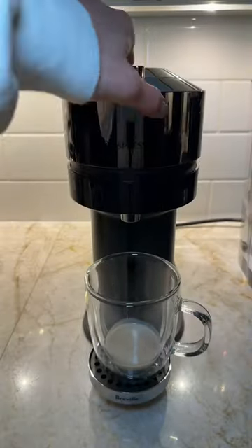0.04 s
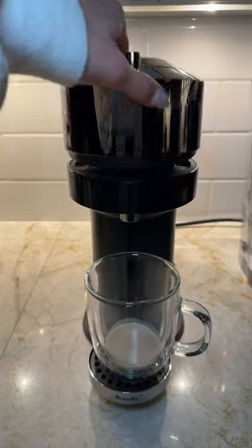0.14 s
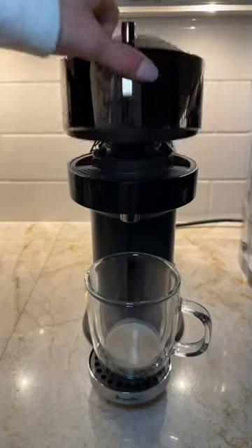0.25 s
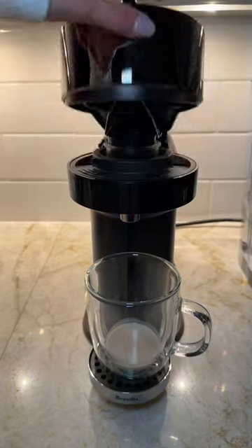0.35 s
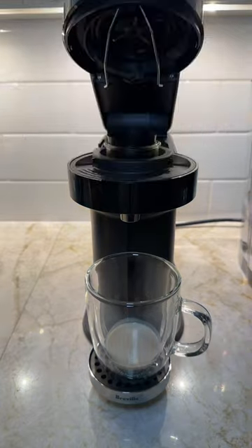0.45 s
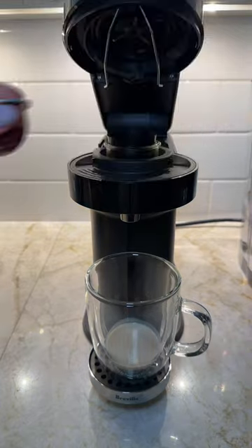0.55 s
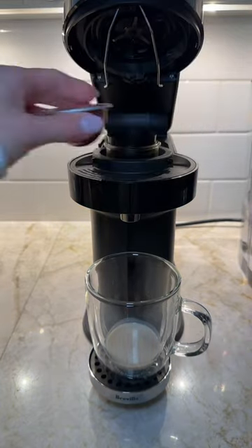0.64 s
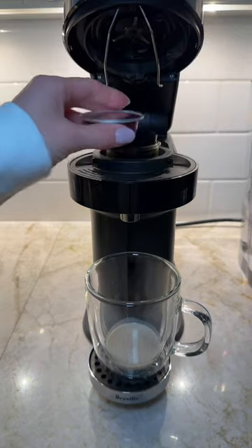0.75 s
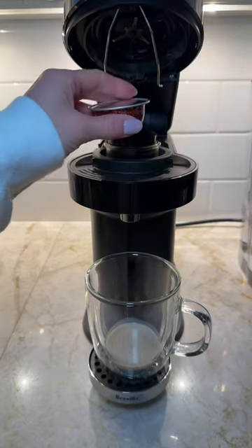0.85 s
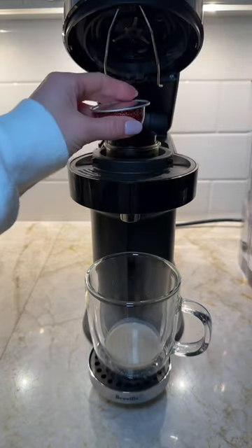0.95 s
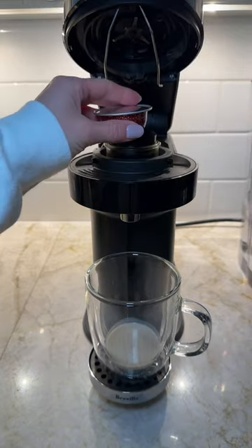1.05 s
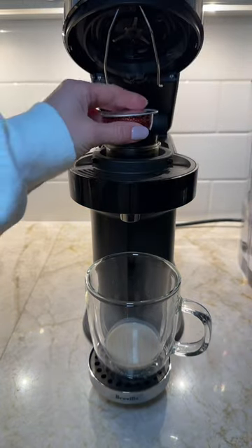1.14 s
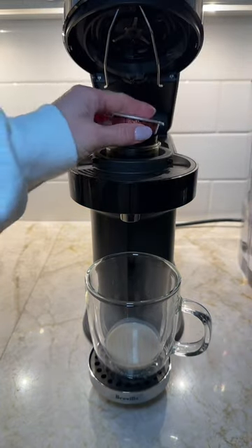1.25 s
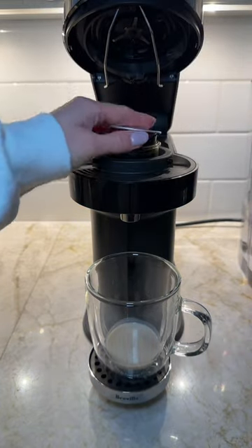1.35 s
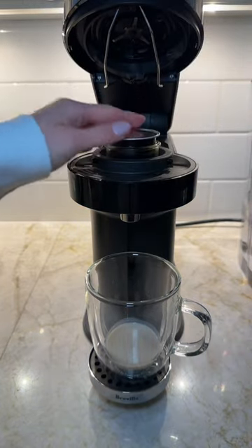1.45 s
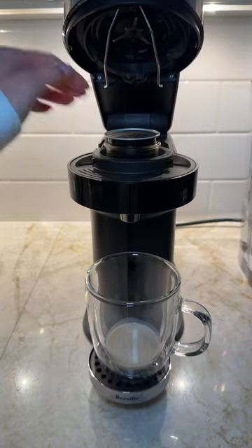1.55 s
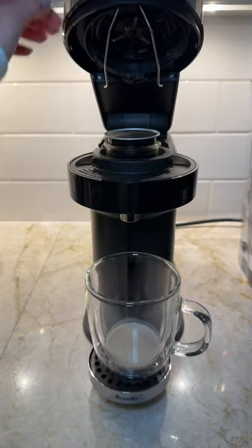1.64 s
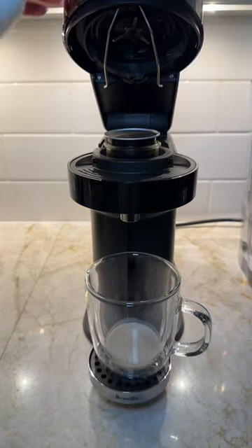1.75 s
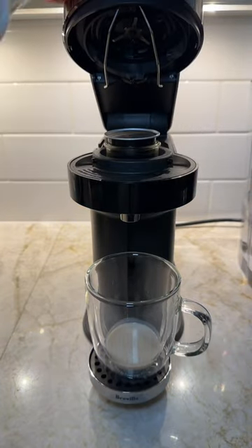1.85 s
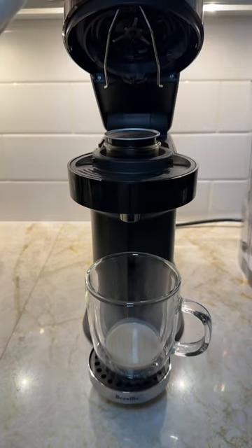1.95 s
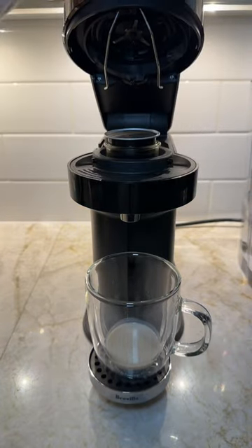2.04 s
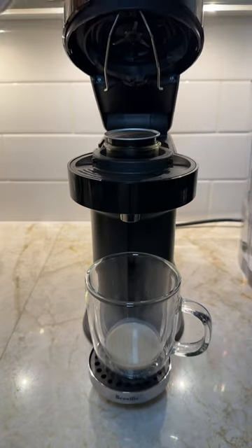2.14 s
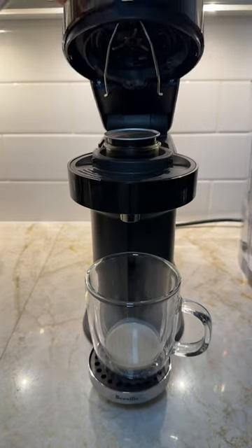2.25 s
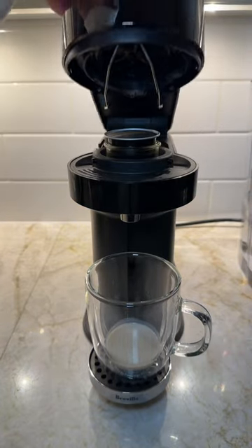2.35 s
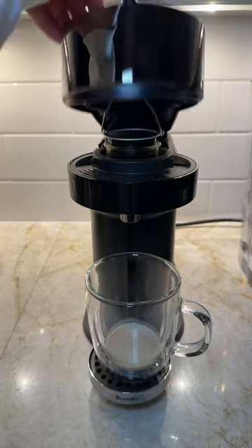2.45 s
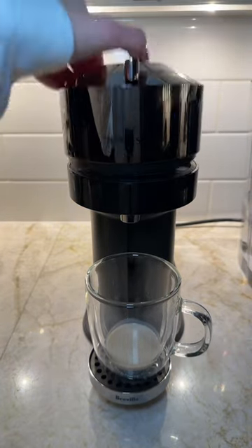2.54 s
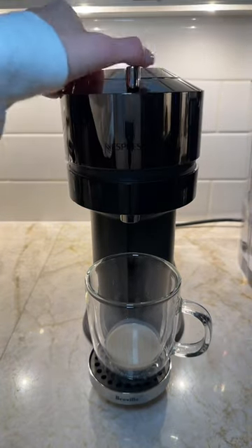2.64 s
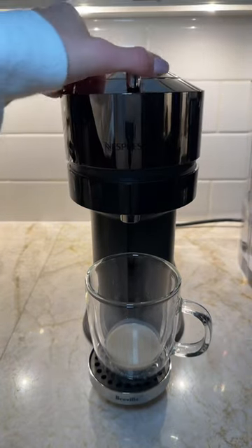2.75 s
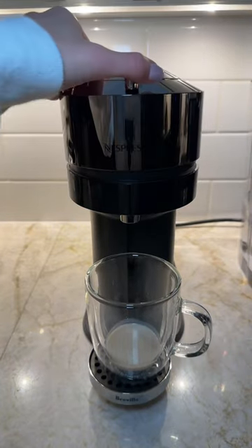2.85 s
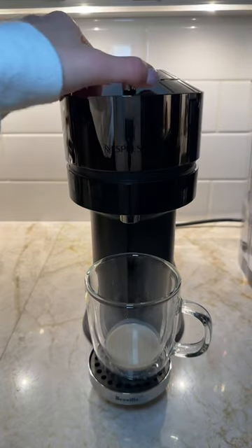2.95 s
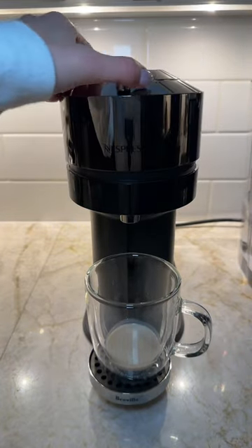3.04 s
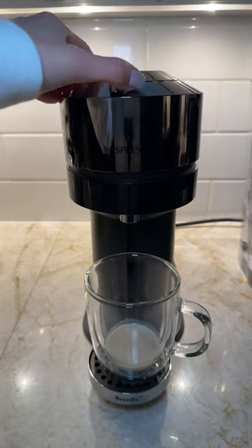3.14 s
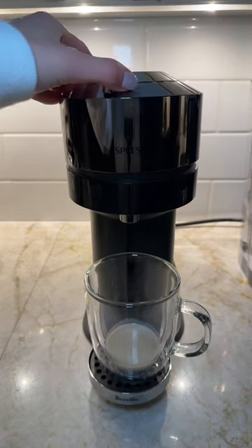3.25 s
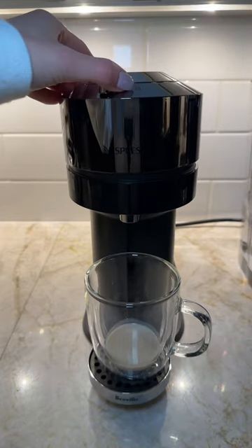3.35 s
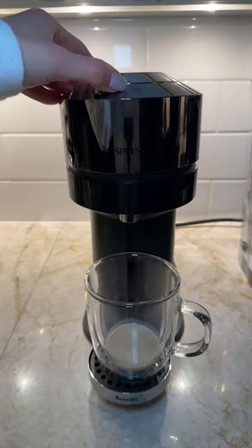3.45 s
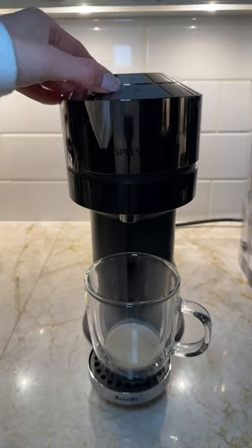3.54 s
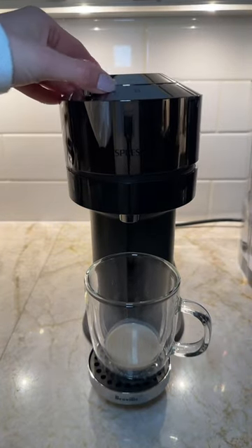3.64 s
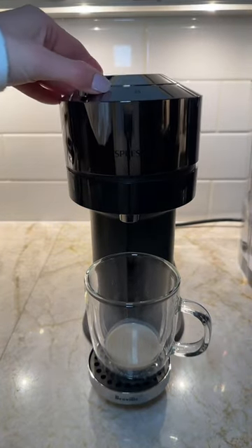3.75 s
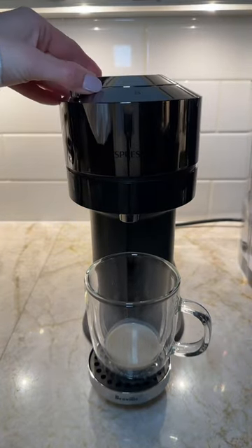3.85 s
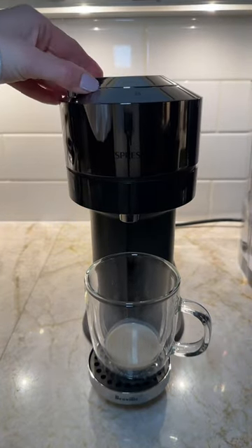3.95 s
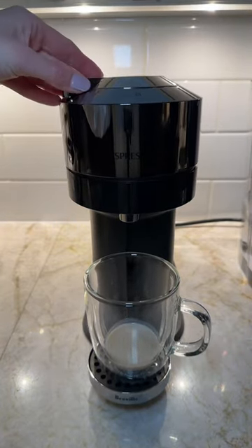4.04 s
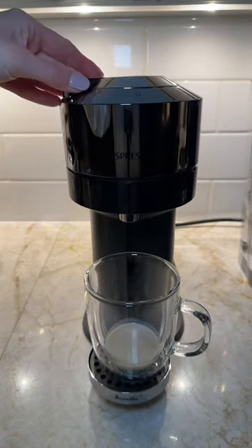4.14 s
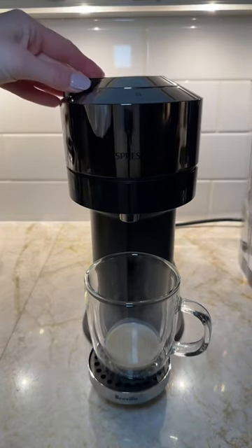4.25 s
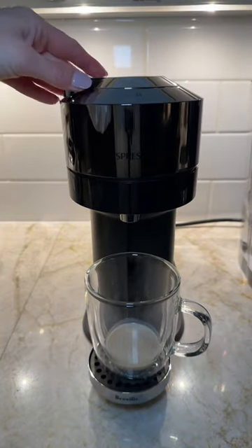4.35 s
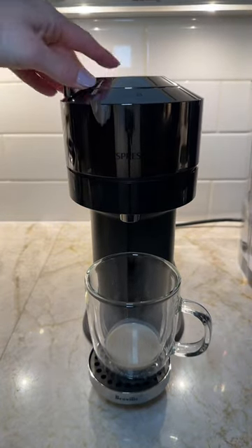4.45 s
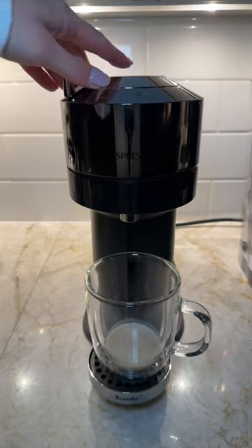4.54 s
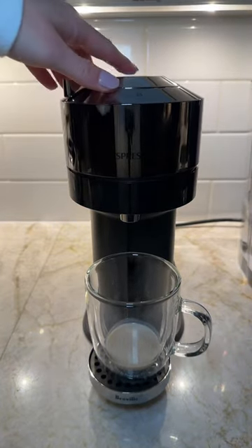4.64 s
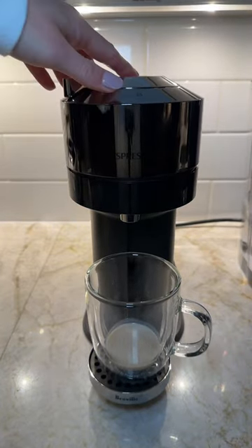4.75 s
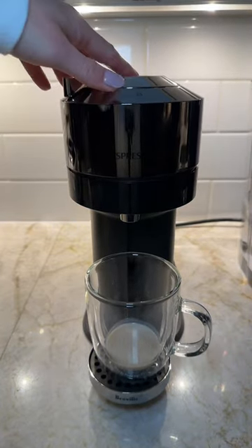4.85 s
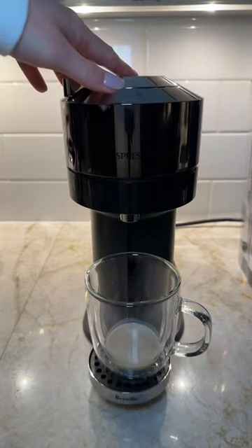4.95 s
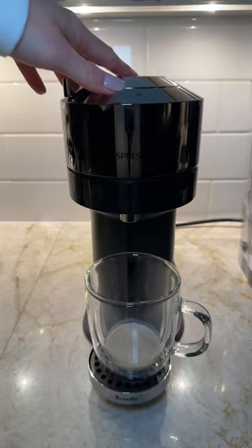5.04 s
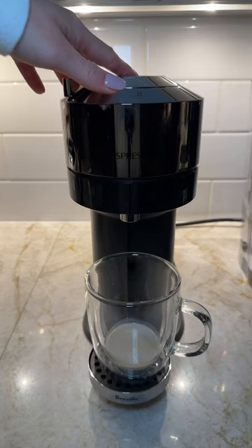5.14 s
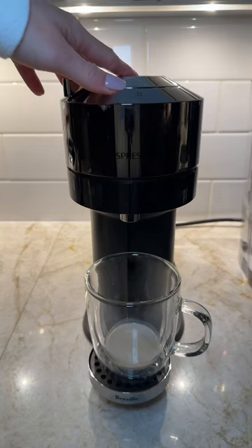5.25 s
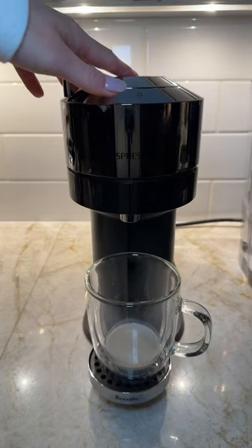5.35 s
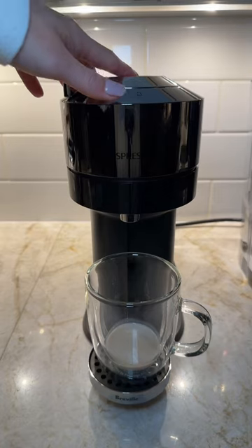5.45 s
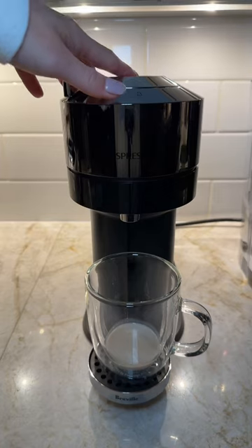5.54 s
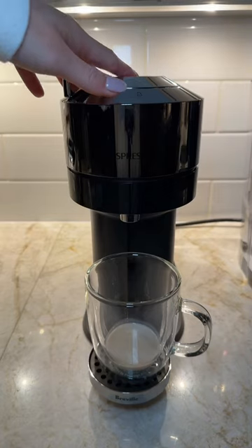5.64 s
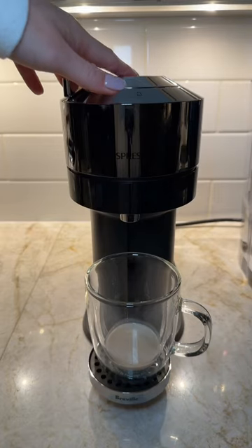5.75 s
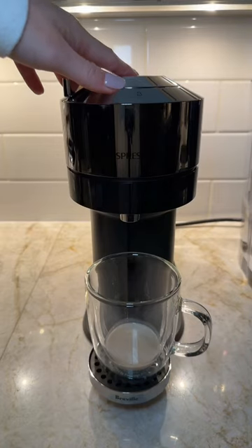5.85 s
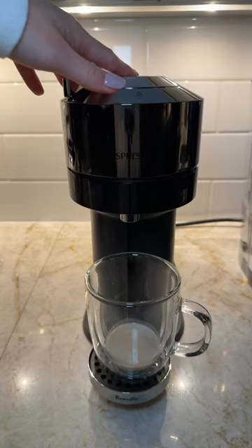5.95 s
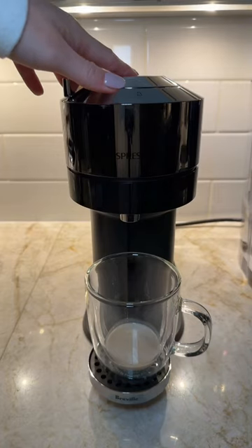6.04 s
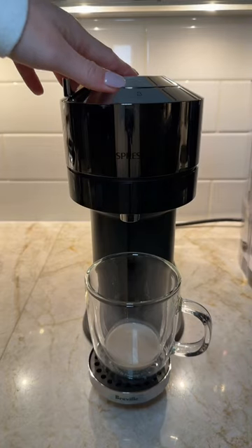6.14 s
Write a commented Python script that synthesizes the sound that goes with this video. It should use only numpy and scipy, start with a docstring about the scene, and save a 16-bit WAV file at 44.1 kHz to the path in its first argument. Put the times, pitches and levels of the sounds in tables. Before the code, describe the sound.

Close plastic clatter of a capsule coffee machine being opened, loaded, slammed shut and locked over faint kitchen hum, ending as its motor begins to whine.

```python
"""Capsule coffee machine in a humming kitchen

A capsule coffee machine stands on a stone counter in a small kitchen where an appliance hums.
Its plastic lid is unlatched and swings up, a foil capsule drops in, the lid slams and its springs buzz,
the lever is slid over and locked, the button is pressed and the motor starts to whine.
Contacts are noise bursts through resonances, friction is coloured noise, rings are decaying modes
and the motors are sines of gliding pitch; a noise echo forms the room. The sound drops out briefly."""
import sys
import numpy as np
from scipy import signal
from scipy.fft import rfft, irfft
from scipy.io import wavfile
from scipy.ndimage import uniform_filter1d

SR = 44100
rng = np.random.default_rng(int(sys.argv[2]) if len(sys.argv) > 2 else 0)


def bounce(signal):
    """Save signal as a 16-bit WAV file at the path given by the first command-line argument."""
    frames = np.transpose(np.atleast_2d(signal))
    limited = np.clip(frames, -1, 1)
    pcm = np.round(limited * 32767).astype(np.int16)
    wavfile.write(sys.argv[1], SR, pcm)


N = 273420
TIME = np.arange(N) / SR


def from_db(db):
    """Logarithmic level: decibels to amplitude gain."""
    return 10 ** (np.asarray(db) / 20)


def rms_one(x):
    """Normalisation: scale a signal to an rms of 1."""
    return x / np.sqrt(np.mean(x ** 2) + 1e-30)


def at_hz(points, hz):
    """Interpolation: read a curve of (frequency, value) on a log-frequency axis."""
    f, value = np.transpose(points)
    return np.interp(np.log(np.maximum(hz, 1)), np.log(f), value)


def coloured(x, spectrum):
    """Spectral shaping: weight a steady signal by a spectrum, at an rms of 1."""
    gain = from_db(at_hz(spectrum, np.fft.rfftfreq(N, 1 / SR)))
    return rms_one(irfft(rfft(x) * gain, N))


def noise_band(x, low_hz, high_hz, order):
    """Band-pass filtering: keep the part between two frequencies."""
    return signal.sosfilt(signal.butter(order, [low_hz, high_hz], "band", fs=SR, output="sos"), x)


def drift(rate_hz):
    """Low-pass random modulation: a smooth chance fluctuation with an rms of 1."""
    white = rfft(rng.standard_normal(N))
    return rms_one(irfft(white / (1 + (np.fft.rfftfreq(N, 1 / SR) / rate_hz) ** 2) ** 2, N))


def resonance(x, hz, width_hz):
    """Damped oscillator: a two-pole resonance with a gain of 1 at its peak."""
    radius = np.exp(-np.pi * width_hz / SR)
    numerator = np.array([1, 0, -1]) * (1 - radius * radius) / 2
    denominator = [1, -2 * radius * np.cos(2 * np.pi * hz / SR), radius * radius]
    return signal.lfilter(numerator, denominator, x)


def fade(t, t60):
    """Exponential decay: the level falls by 60 dB in t60 seconds."""
    return np.exp(-np.log(1000) * t / np.maximum(t60, 1e-3))


def ringing(modes, size):
    """Modal superposition: decaying sines in chance phases."""
    t = TIME[:size]
    return sum(from_db(db) * fade(t, t60) * np.sin(2 * np.pi * (hz * t + rng.random()))
               for hz, db, t60 in modes)


def add(out, s, sound):
    """Linear superposition: mix a sound in at time s."""
    at = max(0, int(s * SR))
    out[at:at + len(sound)] += sound[:N - at]


def since(s):
    """Delayed time axis: seconds since time s, zero before it."""
    return np.maximum(TIME - s, 0)


def strokes(rows, attack_s, t60):
    """Amplitude envelope: each stroke swells, holds and decays exponentially."""
    return sum(from_db(db) * np.minimum(since(s) / attack_s, 1) * fade(since(s + length), t60)
               for s, length, db in rows)


def friction(gain, spectrum, grain_db):
    """Stick-slip friction: sliding surfaces catch and slip in fine uneven grains."""
    grains = rng.standard_normal(N) * from_db(grain_db * drift(460))
    return gain * coloured(grains, spectrum)


# spectrum of the room's air noise: (frequency [Hz], density [dB per Hz])
AIR_COLOUR = [(20, -41.5), (35, -25), (55, -6), (80, -16), (115, -9.5), (170, -15.5), (235, -8.5),
              (320, -14.5), (450, -18), (600, -24.5), (1000, -29), (1750, -34.5), (4000, -39.5),
              (11000, -48.5), (14000, -47.5), (16000, -62)]
AIR_DB = -66.5


def air():
    """Stationary noise: the steady background of the room."""
    return from_db(AIR_DB) * coloured(rng.standard_normal(N), AIR_COLOUR)


# overtones of the appliance hum: (multiple of its pitch [1], level [dB])
HUM_OVERTONES = [(2, -72), (3, -81.5), (4, -82.5), (6, -91.5)]
# faint drones in the room: (frequency [Hz], wander [Hz], level [dB])
DRONES = [(57.2, 2.2, -68.5), (328, 9, -81.5), (1662, 14, -89)]
# a distant appliance motor picks up speed, loudest while it strains
HUM_START_S, HUM_SETTLE_S = 0.66, .33
HUM_FROM_HZ, HUM_TO_HZ, HUM_CREEP_HZ_PER_S = 97, 111.4, .75
HUM_DB, HUM_STRAIN_DB, HUM_STRAIN_S = -65, 7.5, .42


def hum(waver_db=3.0, wander_hz=1.3):
    """Harmonic series: a wavering motor hum settles in speed beside faint drones of wandering pitch."""
    t = since(HUM_START_S)
    hz = HUM_TO_HZ + (HUM_FROM_HZ - HUM_TO_HZ) * np.exp(-t / HUM_SETTLE_S) + HUM_CREEP_HZ_PER_S * t
    level_db = HUM_DB + HUM_STRAIN_DB * t / HUM_STRAIN_S * np.exp(1 - t / HUM_STRAIN_S)
    turns = np.cumsum(hz + wander_hz * drift(6.8)) / SR
    running = sum(from_db(db + waver_db * drift(4.4)) * np.sin(2 * np.pi * multiple * turns)
                  for multiple, db in [(1, level_db)] + HUM_OVERTONES)
    drones = sum(from_db(db) * np.sin(2 * np.pi * np.cumsum(f + wander * drift(2 * wander)) / SR)
                 for f, wander, db in DRONES)
    return np.sqrt(2) * (running + drones)   # levels are rms


# reverberation time of the kitchen: (frequency [Hz], t60 [s])
KITCHEN_DECAY = [(100, 0.38), (500, 0.58), (2500, 0.37), (6000, 0.27), (14000, .25)]


def kitchen(x, wet_db=-13, early_db=-13, early_t60=.09, size=26000):
    """Reverberation: quick reflections from counter and tiles, then a diffuse tail that dies by band."""
    t, edges = TIME[:size], np.geomspace(70, 17000, 9)
    tail = sum(noise_band(rng.standard_normal(size), low, high, 2)
               * fade(t, at_hz(KITCHEN_DECAY, np.sqrt(low * high))) for low, high in zip(edges, edges[1:]))
    early = rng.standard_normal(size) * fade(t, early_t60)
    late_echo = from_db(wet_db) * rms_one(tail * (t > .007))
    early_echo = from_db(early_db) * rms_one(early * (t > .003))
    return signal.fftconvolve(x, (late_echo + early_echo) / np.sqrt(size))[:N]


# a soft low bump while the lid is open: (time [s], length [s], level [dB])
BUMP_STROKES = [(2.085, 0.081, -52.5)]
# its spectrum: (frequency [Hz], density [dB per Hz])
BUMP_SPECTRUM = [(30, -28), (65, 3.5), (150, -9), (265, 1.5), (360, -21), (700, -49.5)]


def bump(attack_s=0.016, t60=0.22):
    """Enveloped noise: low coloured noise swells and dies away."""
    return strokes(BUMP_STROKES, attack_s, t60) * coloured(rng.standard_normal(N), BUMP_SPECTRUM)


# strokes of hinge, fingers and lever sliding: (time [s], length [s], level [dB])
RUB_STROKES = [(0, 0.075, -53.5), (.15, 0.23, -56.5), (.43, 0.024, -46.5), (.95, 1, -75), (2.55, 0.83, -74),
               (3.36, 0.18, -68.5), (3.62, 0.51, -70), (4.06, 0.065, -65), (4.255, 0.12, -57.5)]
# their spectrum: (frequency [Hz], density [dB per Hz])
RUB_SPECTRUM = [(20, -22.5), (80, -4.5), (250, 4.5), (600, 3), (1000, -1.5), (2800, -11.5), (5000, -16.5),
                (8500, -22), (11500, -34.5), (14000, -20), (16000, -30)]


def rubbing(attack_s=.03, t60=.45):
    """Sliding friction: hinge, fingers and lever make mostly low grainy noise."""
    return friction(strokes(RUB_STROKES, attack_s, t60), RUB_SPECTRUM, grain_db=1.0)


# strokes of foil and skin over capsule and lever: (time [s], length [s], level [dB])
BRUSH_STROKES = [(0, 0.62, -77), (.76, 0.21, -78.5), (1.12, .03, -71), (1.57, 0.089, -65),
                 (1.95, 0.093, -72.5), (2.16, 0.072, -81), (3.75, 0.52, -82)]
# their spectrum: (frequency [Hz], density [dB per Hz])
BRUSH_SPECTRUM = [(1180, -50), (2000, -16.5), (2530, -8.5), (4340, -4.5), (5070, -6), (8260, -5),
                  (9250, -7), (14200, -7), (16000, -12)]


def brushing(attack_s=0.021, t60=0.19, scrape_db=-1.5, ring_db=1, ring_width_hz=130):
    """Friction-driven resonance: the foil rim scrapes into its seat and sings faintly in its own modes."""
    scrape = friction(strokes(BRUSH_STROKES, attack_s, t60), BRUSH_SPECTRUM, grain_db=2.0)
    singing = sum(resonance(scrape, hz, ring_width_hz) for hz, _, _ in CUP_MODES)
    return from_db(scrape_db) * scrape + from_db(ring_db) * singing


# blows that rock the whole machine on the counter:
# (time [s], frequency [Hz], amplitude before swell and decay [dB], t60 [s])
ROCKING_BLOWS = [(0.043, 88, -35.5, 0.066), (0.441, 353, -33, 0.13), (2.818, 82.1, -35.5, 0.11),
                 (4.318, 505, -28.5, 0.044), (4.326, 343, -28.5, 0.046), (4.324, 56.4, -53, .15)]


def thumps(swell_s=0.0034, size=12000):
    """Rigid-body oscillation: the heavy body answers a blow with a few soft, low cycles."""
    out, t = np.zeros(N), TIME[:size]
    for s, hz, db, t60 in ROCKING_BLOWS:
        swell = 1 - np.exp(-t / swell_s)
        add(out, s, from_db(db) * np.sin(2 * np.pi * hz * t) * fade(t, t60) * swell)
    return out


# taps on the foil capsule: (time [s], level [dB], brightness [dB per octave])
CUP_TAPS = [(1.0658, -50, 3.5), (1.13, -54.5, 2), (1.287, -72, -2), (1.518, -74.5, -2), (1.577, -70.5, -6),
            (1.62, -65.5, 3), (1.661, -69.5, -11), (1.7356, -74, -24.5)]
# modes of the foil capsule: (frequency [Hz], level [dB], t60 [s])
CUP_MODES = [(984, -4, 0.51), (1093, -4, 0.46), (1189, 2.5, 0.21), (1730, -3.5, 0.55), (1810, -12.5, 0.15),
             (2850, -22.5, 0.14), (3940, -19, 0.17), (4500, -9, 0.2), (6038, -18, .22), (7650, -10, 0.11),
             (8030, -3, 0.073), (8450, -13, 0.27), (10250, -15, 0.162)]


def capsule(rattle_hz_per_khz=22, size=24000):
    """Modal broadening: the loose foil cup rattles as it pings, so each mode is a narrow noise band."""
    out = np.zeros(N)
    for s, tap_db, tilt in CUP_TAPS:
        for hz, mode_db, t60 in CUP_MODES:
            noise = rng.standard_normal(2 * size)
            blurred = resonance(noise, hz, rattle_hz_per_khz * hz / 1000)[size:]   # skip the build-up
            level_db = tap_db + mode_db + tilt * np.log2(hz / 1700)
            add(out, s, from_db(level_db) * rms_one(blurred) * fade(TIME[:size], t60))
    return out


# jolts that set the lid springs buzzing: (time [s], level [dB])
JOLTS = [(.160, -66), (.436, -73.5), (2.806, -51.5), (2.853, -42.5)]
# clear modes of the springs: (frequency [Hz], relative level [dB], t60 [s])
COIL_MODES = [(564, -10, 0.9), (664, -4, 0.71), (704, 1.5, 0.94), (722, -1, 0.91), (1598, -3.5, 0.48),
              (1780, -4.5, .7), (2600, -6, 0.48), (2413, -5, .6), (2680, -10, 0.75), (2519, -6, .7),
              (3050, -7.5, 0.76)]
# spectrum of their crowded modes: (frequency [Hz], density [dB per Hz])
COIL_SPECTRUM = [(100, -29.5), (350, -14.5), (560, -10.5), (700, 0.5), (900, -17.5), (1150, -13.5),
                 (1620, 1), (2100, -7), (2450, -2), (3050, -6.5), (3500, -15), (4300, -16), (6000, -19),
                 (8000, -21.5), (11000, -34.5), (16000, -48.5)]


def springs(buzz_t60=1.7, buzz_s=0.25, release_t60=0.54, treble_t60=0.62, treble_hz=3800,
            clear_db=-6, size=40000):
    """High modal density: coil springs buzz like noise, then die away; their treble goes first."""
    t = TIME[:size]
    crowd = coloured(rng.standard_normal(N), COIL_SPECTRUM)[:size]
    low, high = (signal.sosfilt(signal.butter(4, treble_hz, side, fs=SR, output="sos"), crowd)
                 for side in ("low", "high"))
    two_stage_decay = fade(np.minimum(t, buzz_s), buzz_t60) * fade(np.maximum(t - buzz_s, 0), release_t60)
    buzz = low * two_stage_decay + high * fade(t, treble_t60)
    clear = ringing(COIL_MODES, size)
    ring = buzz + from_db(clear_db) * clear / clear[:size // 20].std()
    out = np.zeros(N)
    for s, db in JOLTS:
        add(out, s, from_db(db) * ring)
    return out


# modes of the motor casing: (frequency [Hz], width [Hz], gain [dB])
CASING_MODES = [(217, 90, -2.5), (402, 107, -3.5), (582, 26, 1.5), (800, 27, 0), (997, 29, -2),
                (1160, 110, -4.5), (1960, 49, -8.5), (2470, 67, -17), (3390, 1700, -19)]
MOTOR_START_S, MOTOR_ATTACK_S = 5.94, 0.013
WHINE_START_HZ, WHINE_OCTAVES_PER_S = 406, 2.7   # the motor spins up steadily
WHINE_DB, WHINE_DB_PER_S = -53, -21   # before the gain of the casing modes
WHIRR_DB, WHIRR_DB_PER_S = -64, 18


def motor(flutter=0.023, throb_db=7.0, overtone_db=-17, brighten_db=6.0,
          casing_low_hz=130, casing_high_hz=3000):
    """Swept resonance: a rising gear whine swells at each casing mode; gear whirr brightens with speed."""
    t = since(MOTOR_START_S)
    hz = WHINE_START_HZ * 2 ** (WHINE_OCTAVES_PER_S * t)
    phase = 2 * np.pi * np.cumsum(hz * (1 + flutter * drift(62))) / SR
    tones = np.sin(phase) + from_db(overtone_db) * np.sin(2 * phase)
    whine = rms_one(tones * from_db(throb_db * drift(50)))
    whine = whine * sum(from_db(db) / (1 + (2 * (hz - f) / width) ** 2) for f, width, db in CASING_MODES)
    slowness = np.log2(hz[-1] / hz)   # octaves below the speed reached at the end
    whirr = 0
    for f, width, db in CASING_MODES:
        mode_db = db - brighten_db * slowness * max(np.log2(f / 570), 0)
        whirr = whirr + from_db(mode_db) * resonance(rng.standard_normal(N), f, width)
    whirr = noise_band(whirr, casing_low_hz, casing_high_hz, 2)   # the closed casing muffles it
    whine_part = from_db(WHINE_DB + WHINE_DB_PER_S * t) * whine
    whirr_part = from_db(WHIRR_DB + WHIRR_DB_PER_S * t) * rms_one(whirr)
    return np.minimum(t / MOTOR_ATTACK_S, 1) * (whine_part + whirr_part)


# resonances of the plastic housing: (frequency [Hz], width [Hz], gain [dB])
HOUSING_MODES = [(361.8, 82, 5), (511, 69, 11), (700, 60, 0.5), (1313, 160, 7.5), (1702, 470, 7.5),
                 (2180, 200, -11.5), (2970, 830, 6.5), (3590, 660, 8.5), (4300, 400, 6), (6060, 500, 4),
                 (7720, 1300, 6.5), (13400, 970, 12)]
# limits of the bands in which contacts get their levels: (frequency [Hz])
BAND_EDGES = [60, 250, 900, 2400, 6000, 11000, 16000]
BASS_TOP_HZ = 900
TYPICAL_CONTACT_S, CHATTER_POWER = .003, .42   # longer contacts chatter for longer


def knocks(rows, colour, chatter_t60, pivot_hz, lift_db, crack, part_db, part_width=0.096, lift_octaves=.7,
           grit_db=2.5, hollow_hz=1020, hollow_width_hz=350, hollow=0.35, size=8192):
    """Impact excitation: a crack and a short chatter ring the housing and the struck part."""
    out, t = np.zeros(N), TIME[:size]
    bands = list(zip(BAND_EDGES[:-1], BAND_EDGES[1:]))
    centres = np.sqrt(np.prod(bands, axis=1))
    for s, level_db, weight_db, brightness, contact, hz in rows:
        t60 = chatter_t60 * (contact / TYPICAL_CONTACT_S) ** CHATTER_POWER
        grit = from_db(grit_db * np.repeat(rng.standard_normal(size // 16), 16))
        force = rng.standard_normal(size) * grit * fade(np.maximum(t - contact, 0), t60) + 1e-18
        force[0] += crack * np.sqrt(np.sum(force ** 2)) / 10
        shell = force + sum(from_db(db) * resonance(force, f, width) for f, width, db in HOUSING_MODES)
        shell = shell + from_db(part_db) * resonance(shell, hz, part_width * hz)
        # the housing radiates poorly between its modes
        shell = shell - hollow * resonance(shell, hollow_hz, hollow_width_hz)
        # heavy contacts have more bass, hard ones are brighter
        touch_db = np.where(centres < BASS_TOP_HZ, weight_db, brightness * np.log2(centres / pivot_hz))
        near_part = np.exp(-(np.log2(centres / hz) / lift_octaves) ** 2)
        levels = level_db + at_hz(colour, centres) + touch_db + lift_db * near_part
        for (low, high), db in zip(bands, levels):
            band = rms_one(noise_band(shell, low, high, 3))
            add(out, s, from_db(db) * band * np.sqrt(.02 * SR / size))   # level refers to 20 ms
    return out


# dull blows of hand, lid and lever on the housing: the hand opens the lid, the capsule is seated (1.1 s),
# the lid lands (2.9), the lever slides over (3.4) and home (4.1), fingers find the button (4.6):
# (time [s], level over 20 ms [dB], weight of the bass [dB], brightness [dB per octave],
#  contact time [s], pitch of the struck part [Hz])
DULL_BLOWS = [(.004, -49, 0, 0.5, 0.0034, 637), (.034, -65.5, 13.5, -4, .01, 310),
              (.117, -57.5, 3, -1.5, 0.013, 616), (.158, -57, 10.5, 4, 0.0081, 570),
              (.234, -52.5, 2.5, -1, 0.007, 1290), (.452, -58.5, 7.5, 7.5, 0.012, 600),
              (1.147, -64.5, 11.5, 4, 0.0026, 458), (1.518, -66, -4, -6, 0.0028, 1530),
              (2.864, -53, 11, 1.5, .005, 740), (3.377, -62, 3, -1.5, 0.0081, 1540),
              (3.432, -57.5, 5.5, -6, .005, 430), (3.4547, -49, 0.5, 0, 0.0049, 929),
              (3.772, -59.5, 1, -0.5, .0064, 1400), (4.085, -66.5, 5.5, 3.5, .004, 2510),
              (4.112, -54, -7, 0.5, 0.0051, 620), (4.3155, -35, -3, 2, 0.0039, 806),
              (4.324, -45, 1.5, -2.5, .002, 214), (4.608, -72, 0.5, 4, .0015, 2500),
              (5.666, -63.5, -4.5, -.5, .0018, 1288), (5.738, -60, 0.5, 0, 0.015, 2400),
              (5.818, -50.5, -3, -2.5, .03, 2135)]
# their spectrum: (frequency [Hz], level [dB per band])
BLOW_SPECTRUM = [(122, -2.5), (470, 0.87), (1470, -4.5), (3790, -13.5), (8120, -26), (13270, -27)]


def blows():
    """Soft impact: hand, lid and lever strike the housing with little treble."""
    return knocks(DULL_BLOWS, BLOW_SPECTRUM, chatter_t60=.036, pivot_hz=905, lift_db=3.0, crack=2.9, part_db=3.5)


# hard catches of latch, lid, capsule and lever: the lid is unlatched, its hinge ticks (0.26 s), it swings
# against its stop (0.43), the capsule drops in (1.06) and settles (1.58), the open lid ticks (1.94),
# the lid slams (2.76), the lever locks (from 3.3), the button (5.8):
# (time [s], level over 20 ms [dB], weight of the bass [dB], brightness [dB per octave],
#  contact time [s], pitch of the struck part [Hz])
HARD_SNAPS = [(.0615, -51.5, 0.5, -3, 0.0024, 1530), (.138, -49, 0, -1, 0.0074, 2940),
              (.157, -44.5, -0.5, -0.5, .004, 1730), (.261, -50, 1.5, -2, .002, 2360),
              (.273, -47, 7, -2, 0.0049, 6940), (.288, -47.5, 6, -2.5, .0045, 2480),
              (.3243, -51.5, 10, -4, .005, 1500), (.4285, -39, -7.5, 2, .005, 7870),
              (.435, -36, 3.5, .5, 0.0036, 1700), (.473, -49, 6, 4, .008, 2090),
              (.522, -58.5, 2, 3, .002, 4500), (1.063, -55, 0, -9, .0015, 1720),
              (1.0675, -46.5, 4.5, 5.5, 0.0003, 3920), (1.130, -52, 8.5, 0.5, 0.0039, 1250),
              (1.577, -68, 10.5, -1, .006, 1250), (1.662, -53, 6, -3.5, .0008, 940),
              (1.7367, -51.5, 6, -5, 0.0018, 1130), (1.9401, -54, -3, 1, 0.0017, 8400),
              (2.319, -67, 10, 2.5, .0025, 5100), (2.757, -50, -7, 1, .0021, 720),
              (2.761, -39, 0.5, -0.5, .0008, 4220), (2.7851, -37, -16, 3.5, 0.00048, 7700),
              (2.789, -37, 5, 0, 0.012, 2970), (2.8033, -41.5, -6, 0.5, .0056, 3050),
              (2.8059, -32.5, -14, 1.15, 0.0027, 6120), (2.821, -43.5, 2, 1.5, .009, 4170),
              (2.8513, -32, 0.5, -5.5, .0004, 1643), (3.317, -79.5, 5, -0.5, .001, 5500),
              (3.8178, -57.5, 6, -6, .0025, 2760), (3.926, -73, 4, 3, .0015, 5800),
              (3.957, -42.5, -11, -1, 0.0018, 1860), (5.803, -62, 12, -9.5, .006, 2135)]
# their spectrum: (frequency [Hz], level [dB per band])
SNAP_SPECTRUM = [(122, -19.5), (470, -7.5), (1470, -4.5), (3790, 0.02), (8120, -5.5), (13270, -15.5)]


def snaps():
    """Hard impact: catches snap home with a bright, short chatter."""
    return knocks(HARD_SNAPS, SNAP_SPECTRUM, chatter_t60=.032, pivot_hz=2400, lift_db=3.5, crack=2.3, part_db=7.5)


def scene():
    """Direct and reflected sound: the machine, its echo in the kitchen and the background."""
    machine = snaps() + blows() + rubbing() + thumps() + springs() + capsule() + brushing() + motor()
    return (machine + kitchen(machine) + bump() + hum() + air())[None]


# the brief dropout after the lid opens: (start [s], end [s])
DROPOUT = (.552, .742)


def record(dry):
    """Gating and band-limiting: the sound drops out briefly after the lid opens; the top is cut."""
    inside = (TIME > DROPOUT[0]) & (TIME < DROPOUT[1])
    live = uniform_filter1d(np.where(inside, .004, 1.), size=90)   # smoothed edges
    low_pass = signal.cheby2(16, 70, 16900, fs=SR, output="sos")   # 70 dB down from 16.9 kHz up
    return signal.sosfilt(low_pass, dry * live)


dry = scene()
out = record(dry)
bounce(out)
```